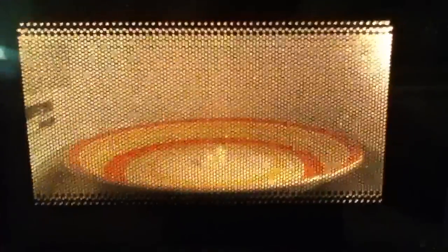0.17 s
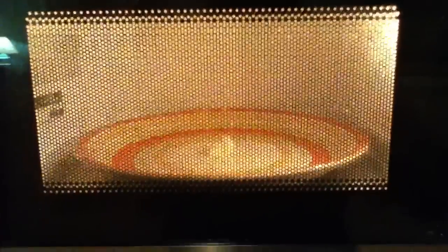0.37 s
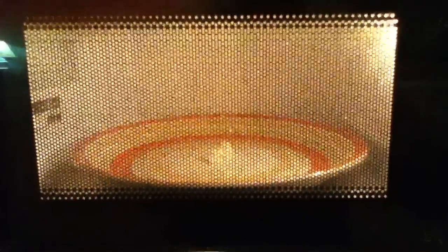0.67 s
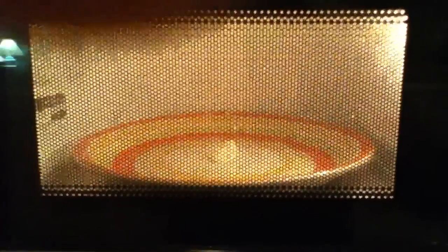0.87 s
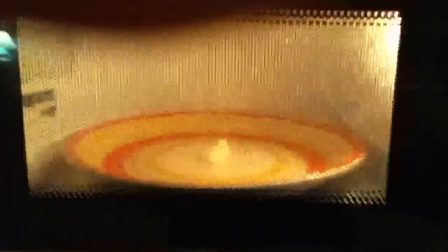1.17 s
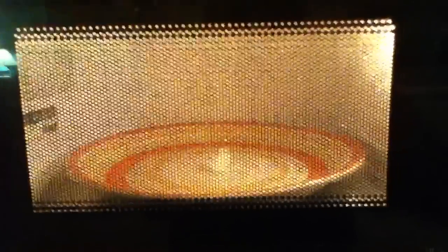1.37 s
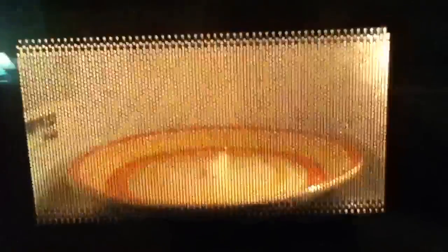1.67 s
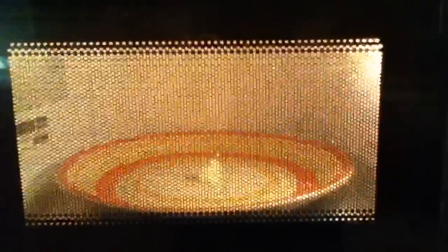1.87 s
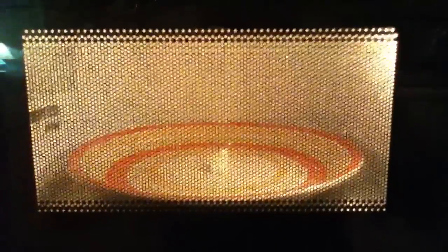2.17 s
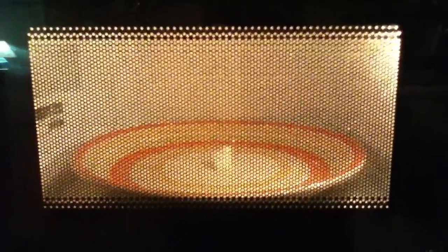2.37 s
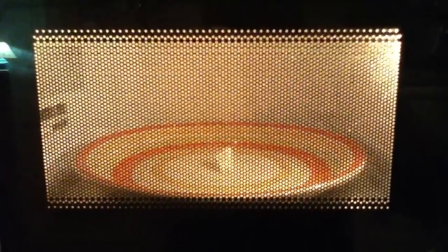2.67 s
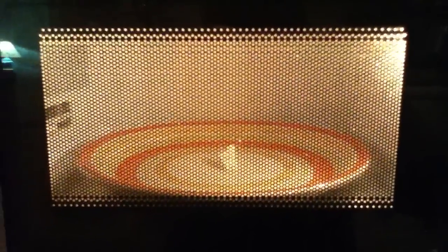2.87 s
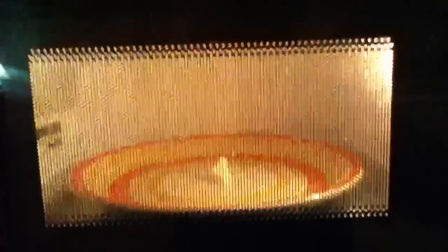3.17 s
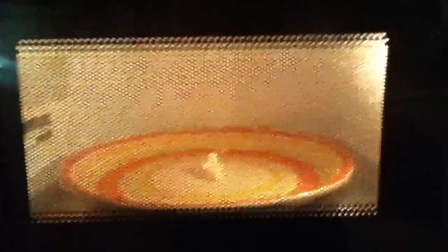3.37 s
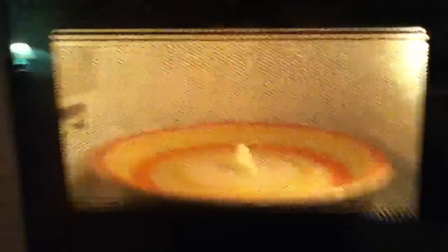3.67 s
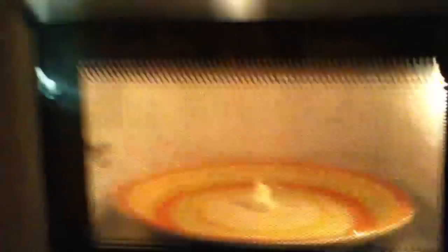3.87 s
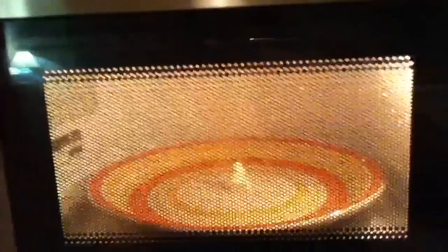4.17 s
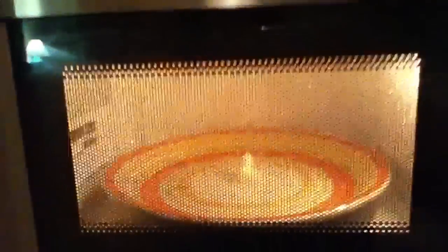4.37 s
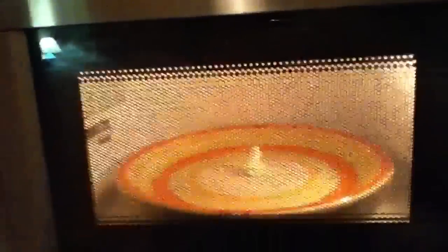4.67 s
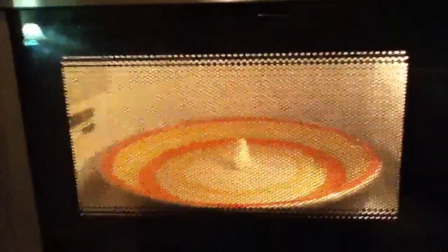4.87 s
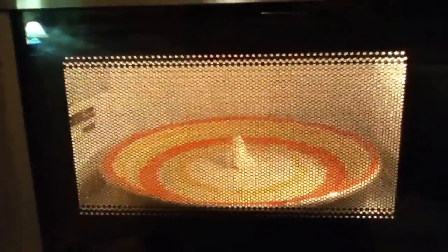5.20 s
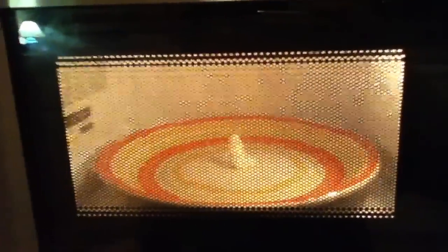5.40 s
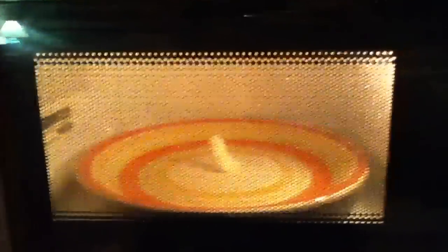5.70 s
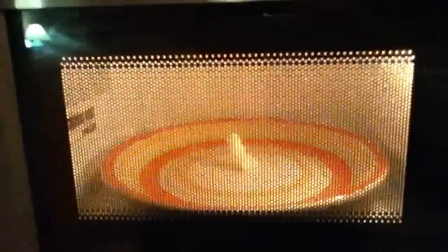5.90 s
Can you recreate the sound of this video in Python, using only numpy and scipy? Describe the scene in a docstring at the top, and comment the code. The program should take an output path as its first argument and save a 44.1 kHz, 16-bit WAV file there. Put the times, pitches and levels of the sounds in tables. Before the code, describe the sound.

A running microwave oven fills a kitchen, heard close on a hand-held phone: steady low mains hum, raspy buzz, fan drone and soft rushing air. A rattly double clack rings briefly near the start, then finger ticks, a short pip around two seconds, a fainter one past three, a sharp tick and rustle near four, and a dull bump before five.

```python
"""A kitchen, with a microwave oven running close to a hand-held phone. Its transformer hums and buzzes
on multiples of the mains frequency; a four-bladed cooling fan adds steady tones and a rush of air made
from filtered noise, over low rumble. Fingers rustle, tick and bump on the phone's case, a small part
pips twice, and something clacks: short fading tones and noise. Other appliances add faint steady tones."""
import sys
import numpy as np
from scipy import signal
from scipy.fft import rfft, irfft, next_fast_len
from scipy.io import wavfile
from scipy.ndimage import uniform_filter1d, map_coordinates

SR = 44100
rng = np.random.default_rng(int(sys.argv[2]) if len(sys.argv) > 2 else 0)


def unload_wav(signal):
    """Save mono or channel-first audio to the path in sys.argv[1] as 16-bit WAV at rate SR, clipped to [-1, 1]."""
    wavfile.write(
        sys.argv[1],
        SR,
        np.round(np.clip(np.atleast_2d(signal).T, -1, 1) * 32767).astype(np.int16),
    )


def how_loud(loudness_db):
    """Turn decibels into a plain amplitude multiplier (0 dB gives 1, 20 dB gives 10)."""
    steps = np.asarray(loudness_db, float) / 20
    return 10 ** steps


N = 266364  # length in samples
T = np.arange(N) / SR  # time in seconds
MAINS_HZ = 59.963

# how duct and cavity colour the air and rumble: centre f/Hz, width/Hz, gain/dB
DUCT = [(144, 12, 8.5), (168, 26, 10), (284, 43, 2), (347, 19, 5), (370, 13, 3.5), (527, 13, 3.5),
        (740, 320, 3), (1254, 106, 5.5), (1714, 350, 6), (2380, 50, 0.5), (2830, 360, 3.5),
        (11800, 3800, -4)]


def unit(x):
    """Scales a sound to an rms level of 1."""
    return x / np.sqrt(np.mean(x ** 2) + 1e-20)


def along(points, hz):
    """Reads a curve of (f/Hz, value) points, joined by straight lines on a log frequency axis."""
    f, v = np.transpose(points)
    return np.interp(np.log(hz + 1), np.log(f + 1), v)


def wobble(rate):
    """Makes a smooth random curve with the given number of random points a second."""
    return map_coordinates(rng.standard_normal(int(N * rate / SR) + 4), [T * rate])


def coloured(x, gain):
    """Filters white noise of rms 1 so that gain(hz) is its strength per root Hz."""
    m = next_fast_len(len(x) + 8192)
    shape = gain(np.fft.rfftfreq(m, 1 / SR)) * np.sqrt(SR / 2)
    return irfft(rfft(x, m) * shape, m)[:len(x)]


def sine(hz, t):
    """A sine of amplitude 1 that starts at a random point of its cycle."""
    return np.sin(2 * np.pi * (hz * t + rng.random()))


def tone(hz, db):
    """A lasting sine of the given rms level, which may be a curve over time."""
    return np.sqrt(2) * how_loud(db) * sine(hz, T)


def fade(t, t60):
    """A fading level that falls by 60 dB in t60 seconds."""
    return how_loud(-60 * t / t60)


def add(track, s, sound):
    """Mixes a sound in from time s; a start before zero loses its beginning."""
    k = round(s * SR)
    sound = sound[max(-k, 0):]
    track[max(k, 0):][:len(sound)] += sound[:N - max(k, 0)]


def place():
    """The phone drifts about before the oven door, which changes three levels in dB over time."""
    # t/s, nearness/dB, standing wave around 390 Hz/dB, air rush around 2900 Hz/dB
    path = [(0, .5, -4, 0), (.6, 0.44, -0.5, 0.5), (1.8, 0.2, -1, 0), (3.8, -0.4, 1.5, 2),
            (4.5, -1, 0.5, 3.5), (6.04, -1.46, -3.5, 2.5)]
    s, *columns = np.transpose(path)
    return [np.interp(T, s, c) for c in columns]


def transformer():
    """The core hums on mains multiples; loose laminations repeat one buzz every mains cycle."""
    # hum before drift and wobble: multiple of the mains, rms level/dB
    hum_lines = [(2, -41), (3, -53), (4, -49.5), (6, -35.5), (7, -53), (8, -46.5), (10, -63), (12, -52),
                 (14, -50), (15, -64), (16, -59), (17, -62)]
    # typical level of each buzz harmonic before scatter and drift: f/Hz, rms level/dB
    buzz_curve = [(1080, -65), (1350, -69), (1600, -66), (1800, -74), (2500, -73), (3100, -80), (5500, -81),
                  (6300, -90), (10500, -94), (11400, -89), (12500, -98), (15000, -101)]
    near_db, wave_db, _ = place()
    hum = np.zeros(N)
    for k, db in hum_lines:
        hz = k * MAINS_HZ
        in_wave = np.exp(-((hz - 390) / 70) ** 4)  # only lines near the standing wave swell with it
        drift_db = in_wave * wave_db + (1 - in_wave) * near_db
        hum += tone(hz, db + drift_db + 1.0 * wobble(1.74) + 0.41 * wobble(6))

    k = np.arange(18, 256)  # the buzz takes over above the hum lines
    scatter_db = rng.uniform(-9, 6, len(k))
    phases = np.exp(2j * np.pi * rng.random(len(k)))
    harmonics = how_loud(along(buzz_curve, k * MAINS_HZ) + scatter_db) * phases
    size = 8192  # samples that draw one buzz cycle
    cycle = irfft(np.pad(harmonics, (k[0], size // 2 - k[-1])), size) * size / np.sqrt(2)
    buzz = np.interp(T * MAINS_HZ % 1, np.arange(size) / size, cycle, period=1)
    return hum + how_loud(near_db) * buzz


def fan_tones():
    """Four blades and the rotor bars give tones; the mains-driven motor adds sidebands around them."""
    # before wobble: multiple of the shaft speed, rms level/dB
    blade_lines = [(1, -50), (4, -35), (8, -63), (12, -55.5), (16, -60.5), (28, -66)]
    # tone of the rotor bars, then its octave: rms level/dB, for each sideband too
    slot_levels = [-63, -67]
    shaft_hz, slots = 38.185, 18
    lines = [(k * shaft_hz, db) for k, db in blade_lines]
    lines.append((8 * shaft_hz - 2 * MAINS_HZ, -51))  # second blade tone minus twice the mains
    for k, db in enumerate(slot_levels):
        for side in (-1, 0, 1):
            lines.append(((k + 1) * slots * shaft_hz + side * 2 * MAINS_HZ, db))
    return sum(tone(hz, db + 0.47 * wobble(2.6)) for hz, db in lines)


def duct_db(hz):
    """Duct and cavity raise or lower the sound in rounded humps around their own frequencies."""
    return sum(db / (1 + (2 * (hz - centre) / width) ** 2) for centre, width, db in DUCT)


def air_rush():
    """Air swirls through the fan's duct: noise with drifting patches of loudness, coloured by the duct."""
    # before the duct and drift: f/Hz, level/dB per Hz
    air_curve = [(200, -70.5), (320, -71.5), (450, -71.5), (520, -77.5), (1000, -78), (2050, -82.5),
                 (2600, -86.5), (4000, -87), (6000, -92), (9000, -97.5), (12000, -99), (15500, -106)]
    near_db, _, upper_db = place()
    cells = signal.stft(rng.standard_normal(N), nperseg=512)[2]
    # smooth random levels over frequency, then time
    patches = uniform_filter1d(rng.standard_normal(cells.shape), size=6, axis=0)
    patches = uniform_filter1d(patches, size=12, axis=1)
    uneven = cells * how_loud(0.7 * unit(patches))
    eddies = unit(signal.istft(uneven, nperseg=2 * len(cells) - 2)[1][:N])

    def rush(hz):
        return how_loud(along(air_curve, hz) + duct_db(hz)) * (hz > 190)

    def upper(hz):
        return np.exp(-((hz - 2900) / 350) ** 2)

    main_air = coloured(eddies, lambda hz: rush(hz) * (1 - upper(hz)))
    upper_air = coloured(eddies, lambda hz: rush(hz) * upper(hz))
    air = main_air + how_loud(upper_db) * upper_air
    return how_loud(near_db + 0.079 * wobble(4.03)) * air


def ticks():
    """Dry finger ticks ring the case for a few milliseconds, with a lower knock under each."""
    # t/s, peak level of the snap/dB, brightest f/Hz, knock against the snap/dB
    tick_list = [(.2864, -39, 12500, -30), (1.0748, -23, 8500, -6), (1.1275, -38, 10000, -20),
                 (1.6904, -39, 11000, -20), (3.9463, -26, 9000, -18), (3.9524, -19, 11000, -17),
                 (4.7125, -32, 6000, -16), (4.7178, -36, 4800, -10), (4.7278, -35, 5000, 5),
                 (4.802, -40, 12000, -20)]
    # what the case rings with: f/Hz, relative level/dB, time to fall 60 dB/s
    case_modes = [(4300, 2, 0.0049), (5230, -4, .004), (6750, 0.5, 0.0036), (7960, 2.5, 0.0028),
                  (9640, 0, .0025), (11600, 1.5, 0.0032), (12900, 0.5, 0.0036), (15300, -10, 0.0026)]
    # the knock: f/Hz, relative level/dB, time to fall 60 dB/s
    knock_modes = [(1100, 3, 0.019), (1810, -5, 0.015), (2800, 1, 0.0088)]
    out, t = np.zeros(N), T[:SR // 50]
    rise = (t / 0.00067).clip(0, 1) ** 2  # rise time in seconds
    for s, db, top_hz, knock_db in tick_list:
        snap = np.zeros(len(t))
        for hz, level, t60 in case_modes:
            off_peak_db = 10 * np.log(hz / top_hz) ** 2  # weaker away from the brightest frequency
            mode_db = level + rng.normal(0, 2) - off_peak_db
            snap += rise * how_loud(mode_db) * fade(t, t60) * sine(hz, t)
        knock = rise * sum(how_loud(level) * fade(t, t60) * np.sin(2 * np.pi * hz * t)
                           for hz, level, t60 in knock_modes)
        add(out, s, how_loud(db) * (snap / abs(snap).max() + how_loud(knock_db) * knock))
    return out


def rubs():
    """Skin slips over the case in tiny grains: rough noise that swells and stops."""
    # start t/s, end t/s, rms level at the top of the swell/dB
    rub_list = [(1.08, 1.17, -60), (1.72, 1.87, -61), (2.46, 2.55, -62), (3.856, 3.967, -50),
                (4.705, 4.735, -54), (5.05, 5.223, -60)]
    # tint of the skin noise: f/Hz, relative level/dB per Hz
    skin_curve = [(3000, -28), (7000, -1), (10000, 2), (13000, -1), (15500, -3)]
    out = np.zeros(N)
    grains = rng.standard_normal(N) * how_loud(4.2 * wobble(1100))
    grit = unit(coloured(grains, lambda hz: how_loud(along(skin_curve, hz))))
    for start, end, db in rub_list:
        progress = np.clip((T - start) / (end - start), 0, 1)
        swell = np.sqrt(np.sin(np.pi * progress ** 1.2).clip(0))
        out += how_loud(db) * swell * grit
    return out


def bump():
    """One dull bump rings the hand and case with a few low fading tones."""
    # f/Hz, relative level/dB, time to fall 60 dB/s
    bump_modes = [(148.6, -8, 0.18), (227, 1.5, 0.18), (300, -5, 0.13), (405, -5.5, 0.11)]
    start_s, level_db, rise_s = 4.712, -26, 0.007
    out, t = np.zeros(N), T[:SR // 4]
    thud = sum(how_loud(db) * fade(t, t60) * np.sin(2 * np.pi * hz * t) for hz, db, t60 in bump_modes)
    add(out, start_s, how_loud(level_db) * (1 - np.exp(-t / rise_s)) * thud)
    return out


def pips():
    """A small part is tapped: one short note, then its fainter ragged after-ring."""
    # t/s, overall level/dB
    pip_list = [(1.9703, -23.5), (3.305, -27.5)]
    pip_hz, rise_s, note_t60_s = 2240, 0.003, 0.024
    tail_db, tail_t60_s = -20, 0.15
    out, t = np.zeros(N), T[:SR // 10]
    for s, db in pip_list:
        rise = (t / rise_s).clip(0, 1) ** 2
        note = fade(t, note_t60_s) * rise * np.sin(2 * np.pi * pip_hz * t)
        noise = rng.standard_normal(len(t))
        ragged = unit(coloured(noise, lambda hz: np.exp(-((hz - pip_hz) / 350) ** 2)))
        add(out, s, how_loud(db) * (note + how_loud(tail_db) * fade(t, tail_t60_s) * ragged))
    return out


def clacks():
    """Something clacks in the kitchen: a crack, then ringing tones and noise die away in the room."""
    # t/s, overall level/dB
    clack_list = [(-.02, -41), (.3968, -33.5), (.413, -36.5)]
    # what rings: f/Hz, relative level/dB, time to fall 60 dB/s
    clack_modes = [(503, -7, 0.24), (610, 5, 0.36), (702, 5, 0.28), (947, 2, 0.28), (1765, 9, .07),
                   (1940, -1, 0.48), (2212, 1.5, 0.23), (2850, 11.5, 0.045), (4190, -2, 0.14)]
    # tint of the noise: f/Hz, relative level/dB per Hz
    noise_curve = [(400, -7), (900, -3.5), (2300, -4.5), (3500, -6.5), (8500, -15), (15500, -28)]
    # times to fall 60 dB; the treble is the part of the noise above about treble_hz
    crack_t60_s, dull_t60_s, treble_t60_s, treble_hz = 0.02, 0.38, 0.29, 5000
    out, t = np.zeros(N), T[:SR // 2]
    for s, db in clack_list:
        ring = np.zeros(len(t))
        for hz, level, t60 in clack_modes:
            mode_db = level + rng.normal(0, 1.5) + 3.5 * wobble(45)[:len(t)]
            build_up = 1 - np.exp(-t * hz / 9)  # low modes take longer to build up
            ring += how_loud(mode_db) * fade(t, t60) * sine(hz, t) * build_up
        noise = coloured(rng.standard_normal(len(t)), lambda hz: how_loud(along(noise_curve, hz)) * (hz > 300))
        noise = unit(noise * how_loud(1.7 * wobble(270)[:len(t)]))  # rattly
        bins_hz = np.fft.rfftfreq(len(t), 1 / SR)
        dull = irfft(rfft(noise) / (1 + (bins_hz / treble_hz) ** 2), len(t))
        tail = fade(t, dull_t60_s) * dull + fade(t, treble_t60_s) * (noise - dull)
        crack = fade(t, crack_t60_s) * noise
        onset = 1 - np.exp(-t / 0.00054)
        add(out, s, how_loud(db) * onset * (how_loud(-7.5) * ring + how_loud(-4.0) * tail + crack))
    return out


def rumble():
    """Low rumble: noise kept below 190 Hz and coloured by the duct."""
    # before the duct: f/Hz, level/dB per Hz
    rumble_curve = [(8, -86), (14, -63), (21, -53.5), (30, -62), (38, -57.5), (52, -65.5), (72, -72),
                    (98, -61), (110, -75.5), (125, -70.5), (200, -72.5)]
    return coloured(rng.standard_normal(N),
                    lambda hz: how_loud(along(rumble_curve, hz) + duct_db(hz)) * (hz <= 190))


def other_appliances():
    """Other appliances in the kitchen give steady sine tones."""
    # f/Hz, rms level/dB
    steady_tones = [(58.9, -57), (82.9, -51), (14994, -85)]
    return sum(tone(hz, db) for hz, db in steady_tones)


def scene():
    """Everything adds up at one microphone."""
    oven = transformer() + fan_tones() + air_rush()
    handling = ticks() + rubs() + bump()
    kitchen = pips() + clacks() + rumble() + other_appliances()
    return (oven + handling + kitchen)[None]


def band_limit(x):
    """A steep low-pass at the top of the band."""
    return signal.sosfilt(signal.butter(12, 16230, fs=SR, output="sos"), x)


def record(dry):
    """A low-pass removes everything above 15800 Hz from the mix."""
    spectrum = rfft(dry) * (np.fft.rfftfreq(N, 1 / SR) < 15800)
    mix = irfft(spectrum, N)
    return band_limit(mix)


dry = scene()
out = record(dry)
unload_wav(out)
```